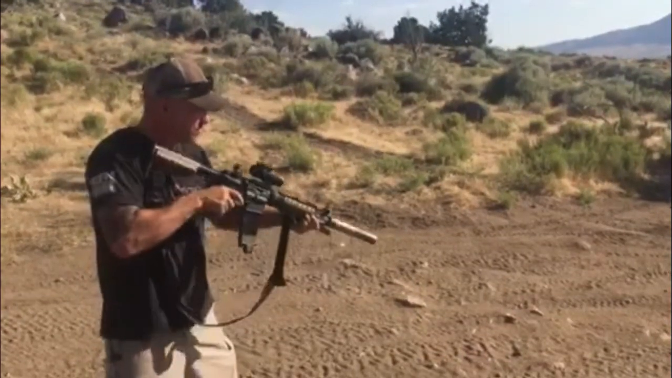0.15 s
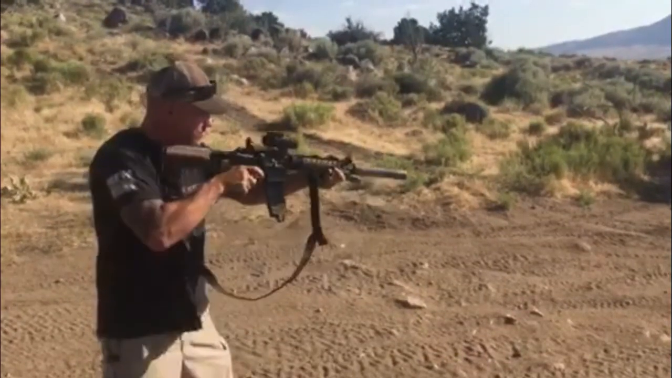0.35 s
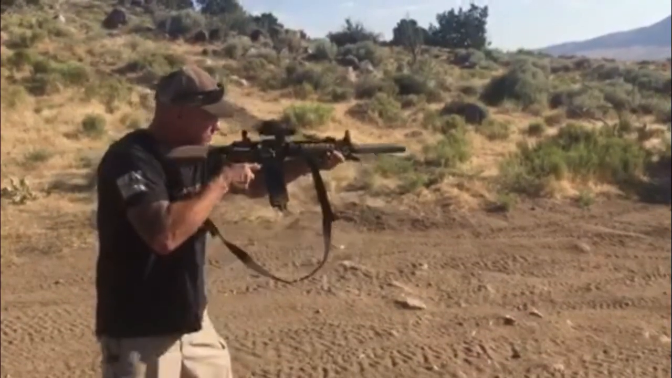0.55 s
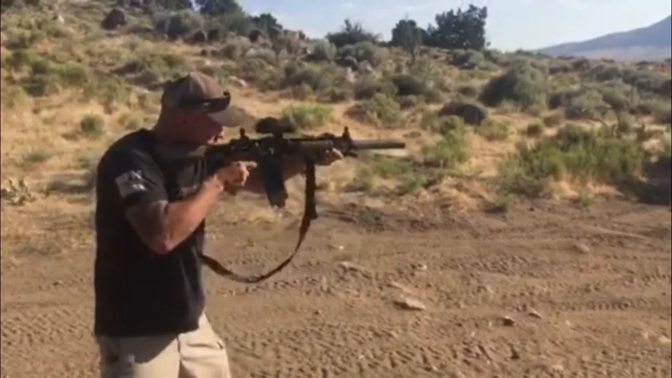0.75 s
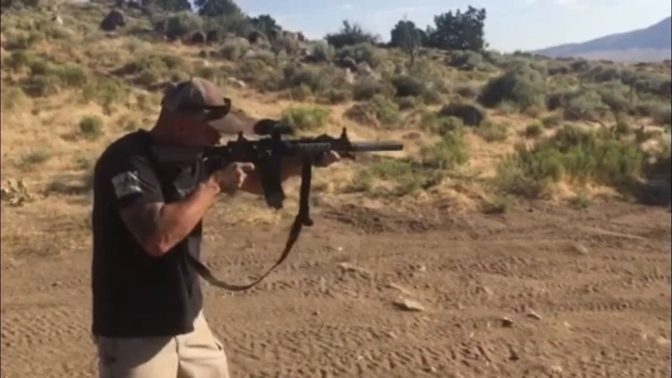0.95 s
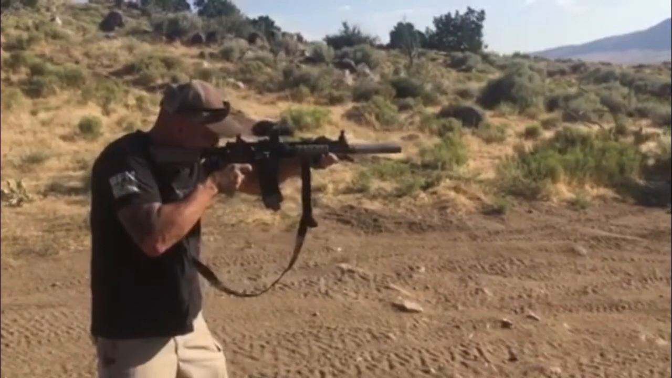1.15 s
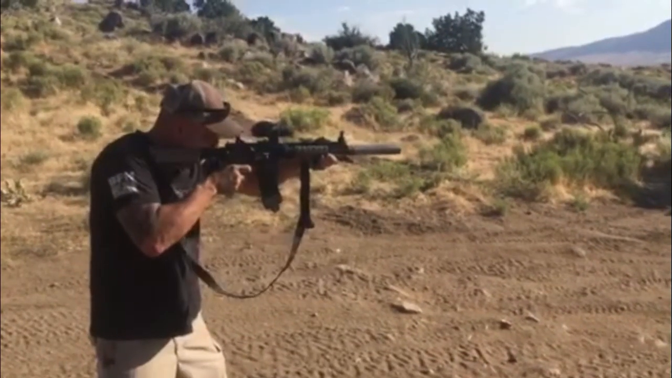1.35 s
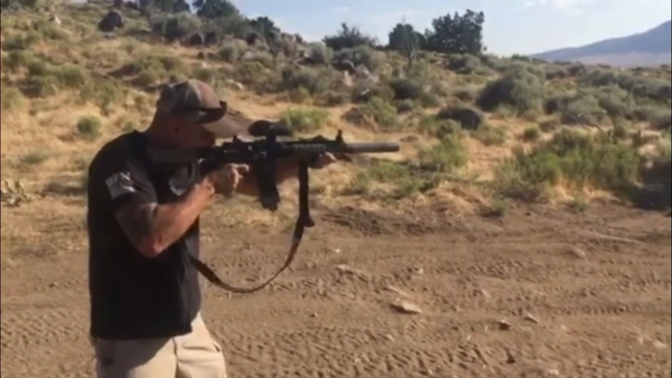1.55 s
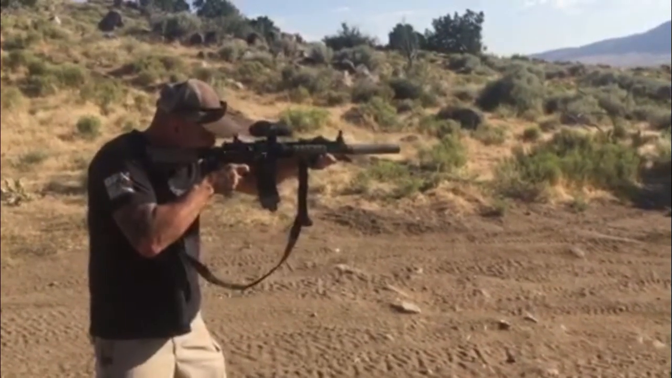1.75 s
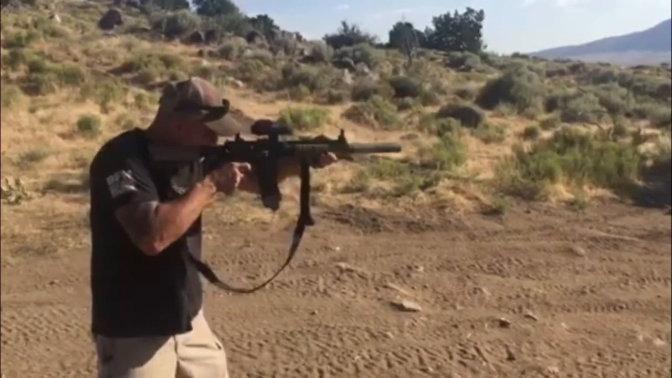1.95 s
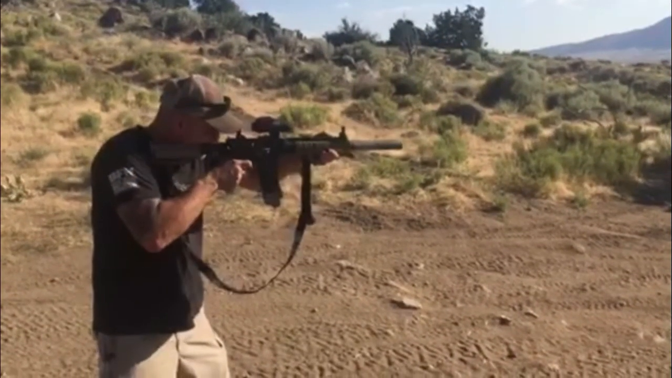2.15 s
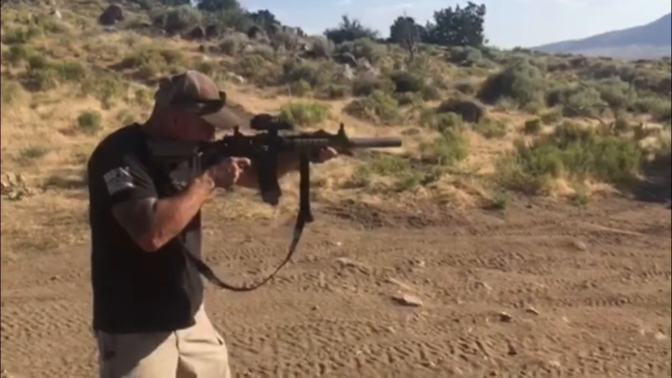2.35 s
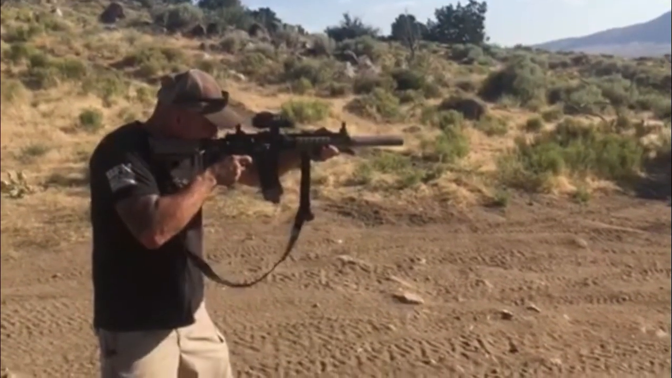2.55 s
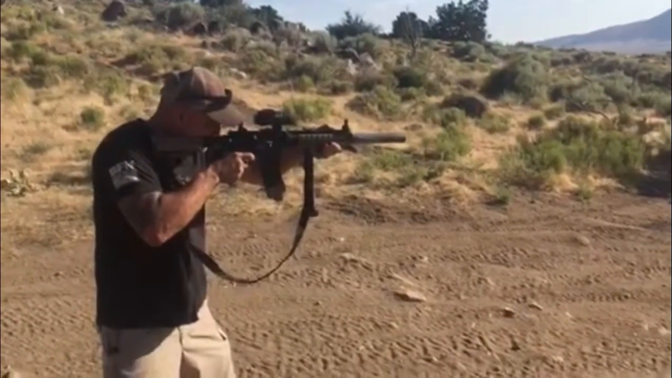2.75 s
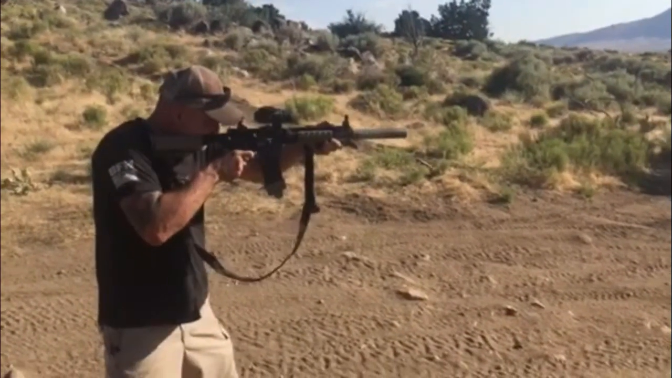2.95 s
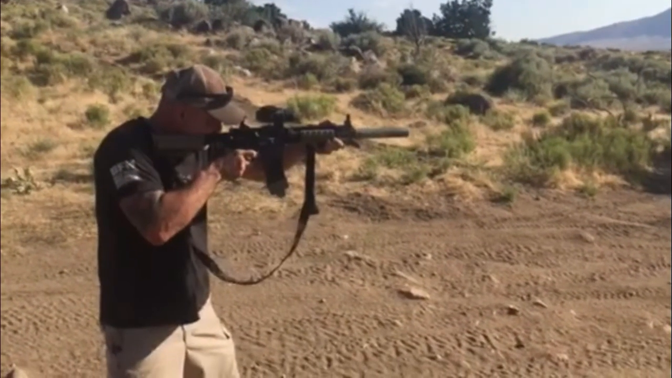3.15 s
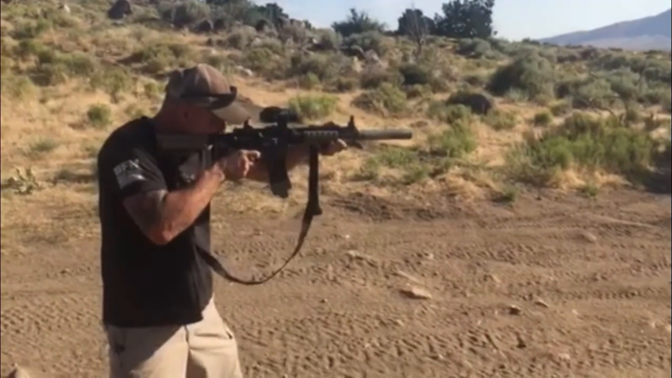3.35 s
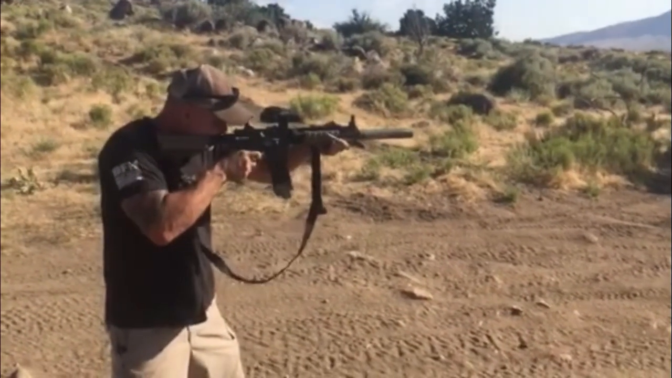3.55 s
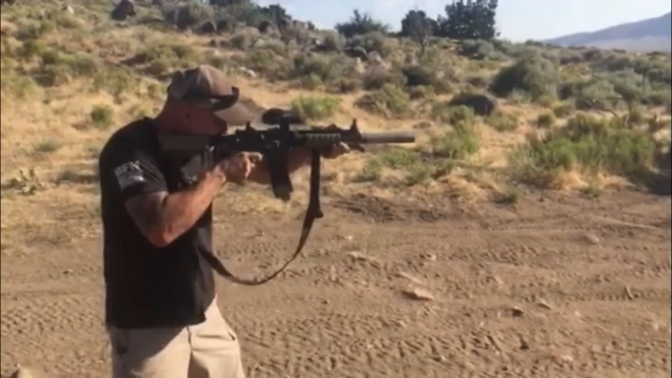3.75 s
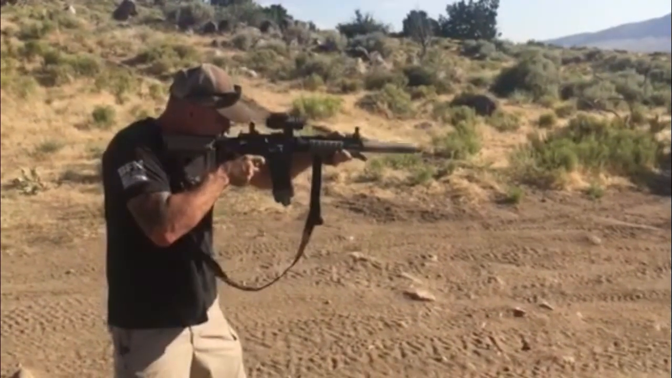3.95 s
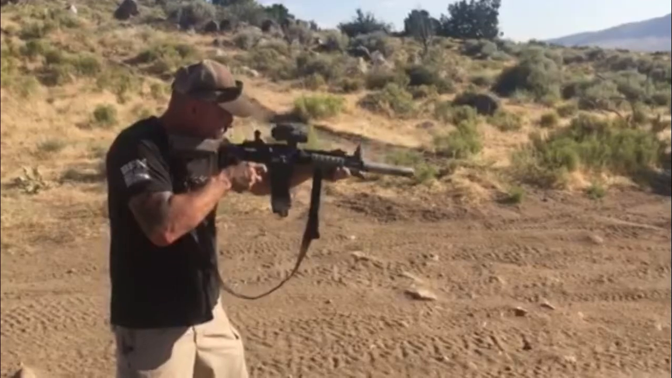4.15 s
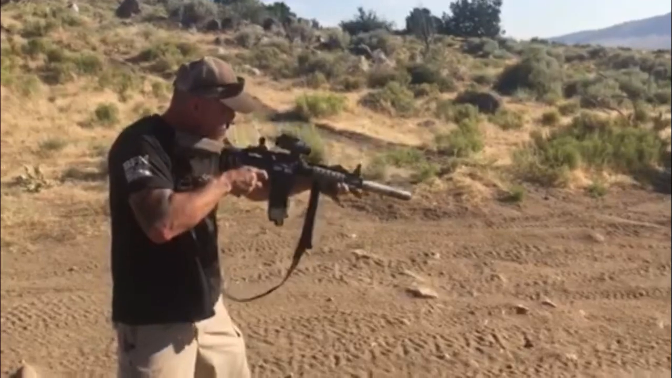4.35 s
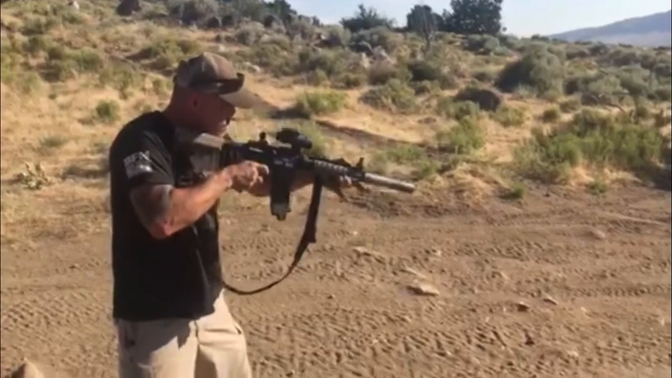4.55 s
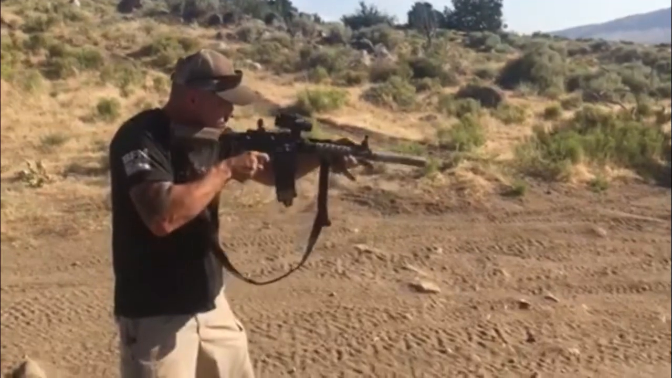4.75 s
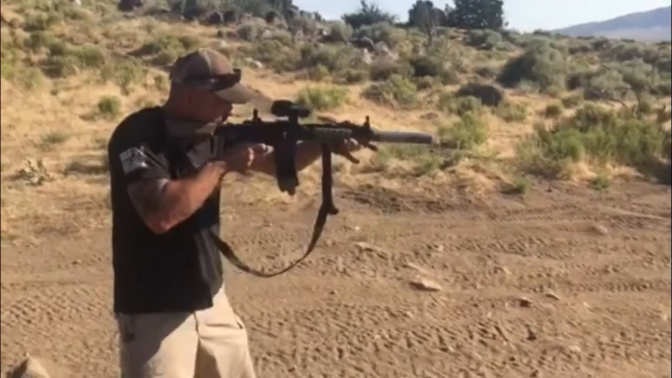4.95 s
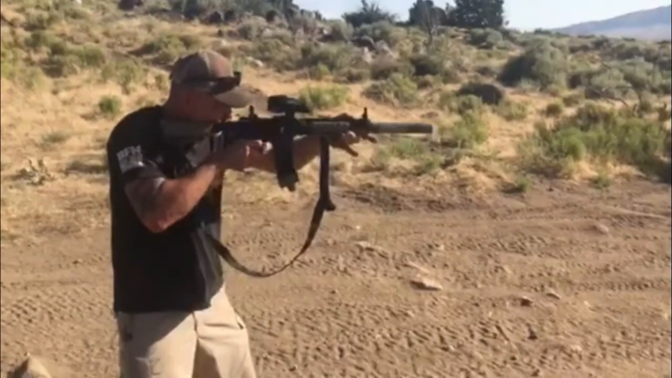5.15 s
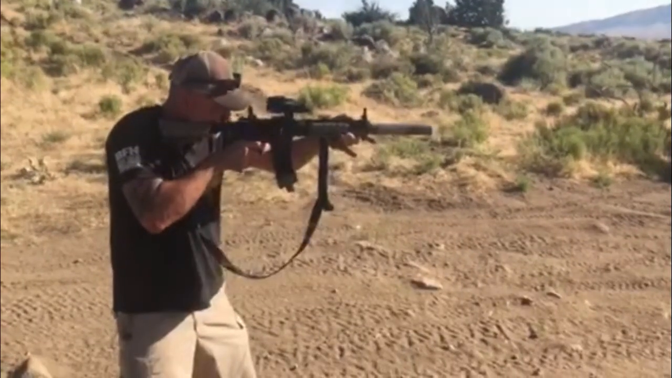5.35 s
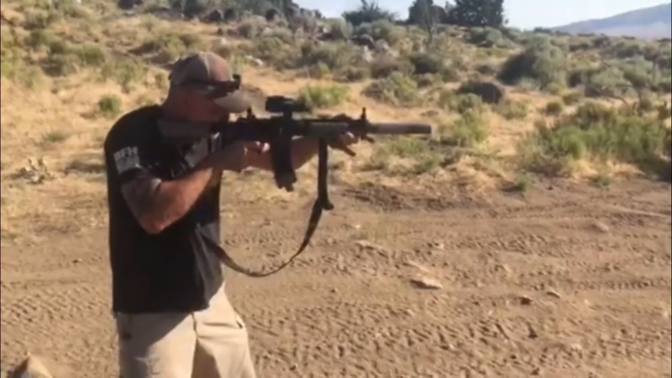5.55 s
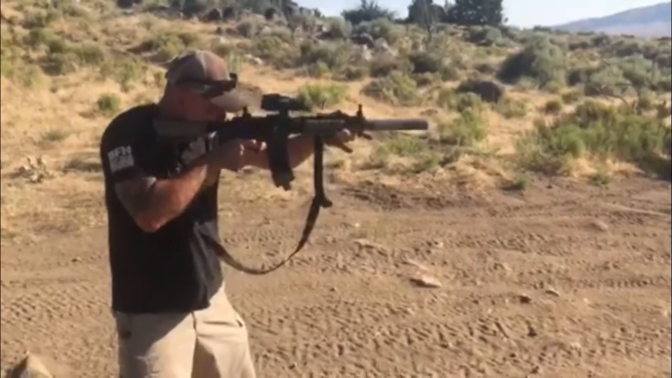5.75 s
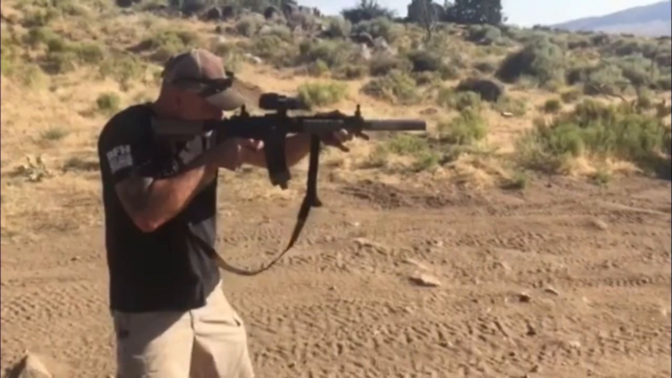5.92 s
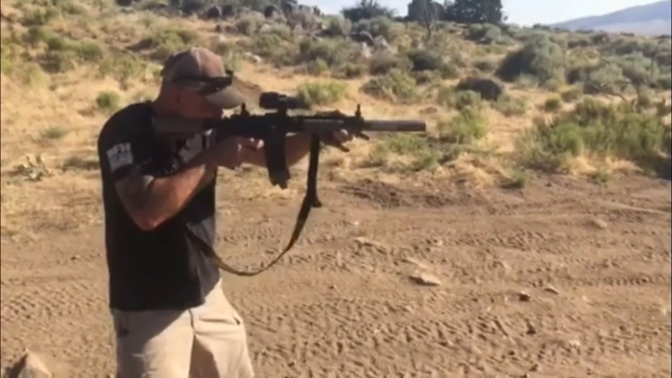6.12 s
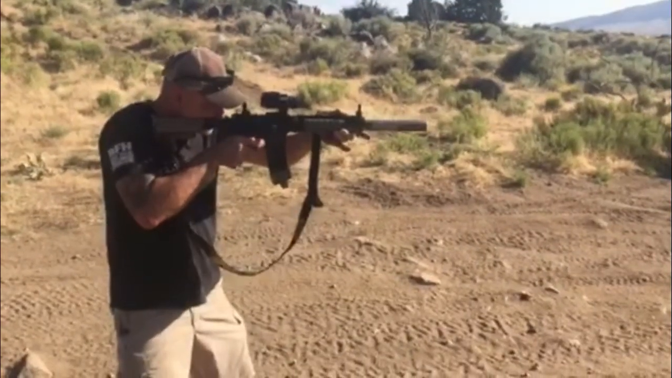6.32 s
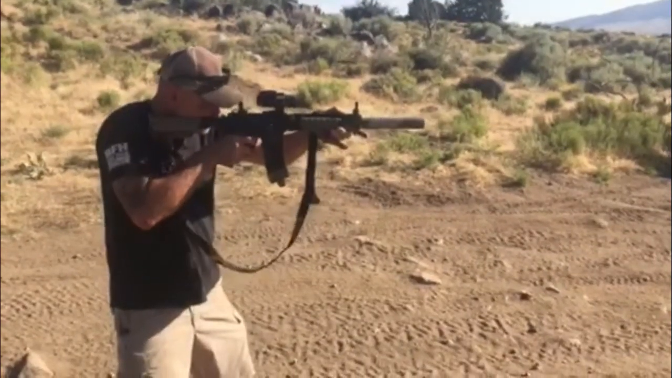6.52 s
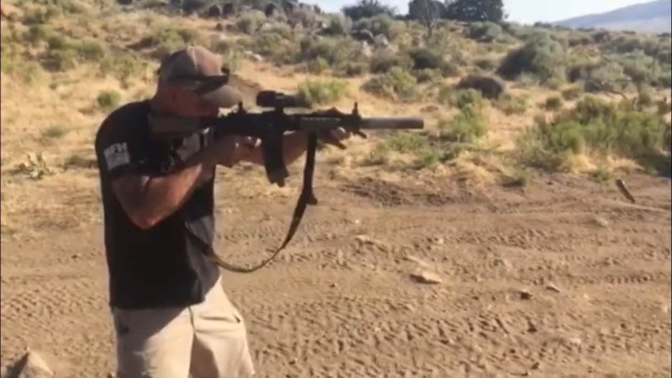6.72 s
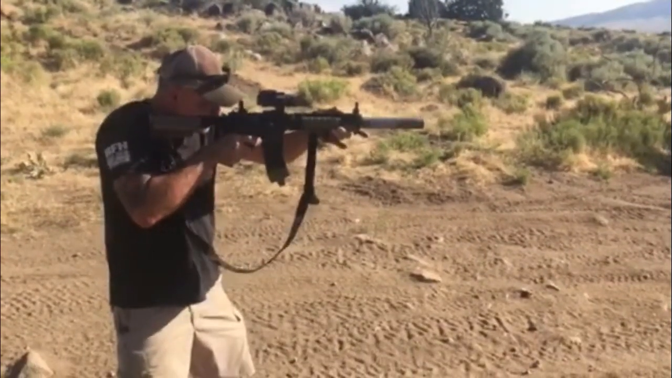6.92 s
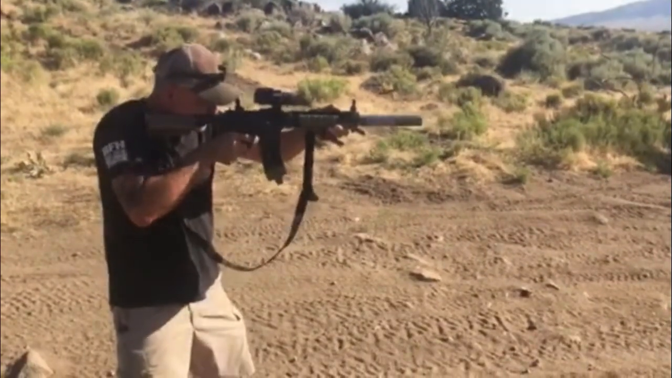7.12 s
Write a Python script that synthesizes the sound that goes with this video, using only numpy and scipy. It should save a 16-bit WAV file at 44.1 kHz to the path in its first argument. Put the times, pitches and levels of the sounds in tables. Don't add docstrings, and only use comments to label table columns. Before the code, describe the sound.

On open desert ground, a close suppressed rifle fires four spaced shots, then three more, with clattering action, rocky echoes and one distant gun thud.

```python
import sys
import numpy as np
from scipy import signal
from scipy.fft import rfft, irfft
from scipy.io import wavfile
from scipy.ndimage import uniform_filter1d

SR = 44100
rng = np.random.default_rng(int(sys.argv[2]) if len(sys.argv) > 2 else 0)


def store_pcm(level_fs):
    pcm = np.round(np.clip(level_fs, -1, 1) * 32767).astype(np.int16)
    wavfile.write(sys.argv[1], SR, np.atleast_2d(pcm).T)


def invert_db(x):
    u = np.asarray(x, float) / 20
    return 10 ** u


N = 316638


def add(out, s, x):
    i = int(s * SR)
    out[i:i + len(x)] += x[:max(N - i, 0)]


def times(seconds):
    return np.arange(int(seconds * SR)) / SR


def fade(t, t60):
    return invert_db(-60 * np.maximum(t, 0) / t60)


def band(x, hz, width_hz, order=3):
    edges = np.clip([hz - width_hz / 2, hz + width_hz / 2], 20, .45 * SR)
    y = signal.sosfilt(signal.butter(order, edges, "bandpass", fs=SR, output="sos"), x)
    return y / np.sqrt(np.mean(y ** 2))


def clumps(n, spread_db, hold=180):
    steps = np.repeat(rng.standard_normal(n // hold + 1), hold)[:n]
    return invert_db(spread_db * uniform_filter1d(steps, hold // 2))


def grit(n, scatter_db, share):
    grain_db = scatter_db * np.minimum(rng.exponential(size=n), 6.5)
    grains = rng.standard_normal(n) * invert_db(grain_db)
    smooth = rng.standard_normal(n)
    return clumps(n, 3.0) * (share * grains / grains.std() + (1 - share) * smooth)


def layers(humps, scatter_db, share):
    out = 0
    for hz, width_hz, db in humps:
        order = 2 if hz > 5000 else 3
        out = out + invert_db(db) * band(grit(len(db), scatter_db, share), hz, width_hz, order)
    return out


def swells(t, rows):
    power = 0
    for s, db, rise_s, t60 in rows:
        rise = np.exp(-(np.minimum(t - s, 0) / rise_s) ** 2)
        power = power + (invert_db(db) * rise * fade(t - s, t60)) ** 2
    return 10 * np.log10(power + 1e-18)


def knock(zones, rise_s=0.0008, length=.08):
    t = times(length)
    y = 0
    for hz, width_hz, db, t60 in zones:
        y = y + invert_db(db) * band(rng.standard_normal(len(t)), hz, width_hz) * fade(t, t60)
    y = y * (1 - np.exp(-(t / rise_s) ** 2))
    return y / np.max(np.abs(y))


def tick(hz, t60, top_db):
    return knock([(hz, 0.49 * hz, 0, t60), (3500, 4500, -6, 1.1 * t60), (8500, 9000, top_db, 0.25 * t60)])


def ring(modes, length=.06, blow_s=0.0004):
    t = times(length)
    y = sum(invert_db(db) * np.sin(2 * np.pi * hz * t) * fade(t, t60) for hz, db, t60 in modes)
    blow = rng.standard_normal(400) * np.exp(-t[:400] / blow_s)
    y = signal.fftconvolve(y, blow)[:len(t)]
    return y / np.max(np.abs(y))


def jet(bands, plateau_s):
    t = times(.25)
    out = 0
    for hz, db, t60 in bands:
        hold_s = plateau_s * (hz / 1400) ** -.25
        out = out + invert_db(db) * band(rng.standard_normal(len(t)), hz, 0.69 * hz) * fade(t - hold_s, t60)
    return out


# pitch in Hz, level in dB per Hz.
AIR_TONE = [(20, -26), (65, 0.44), (200, -12), (636, -19), (1560, -15.5), (3730, -22), (11400, -32),
            (15500, -35)]


def air():
    f = np.maximum(np.fft.rfftfreq(N, 1 / SR), 1)
    hz, db = np.transpose(AIR_TONE)
    y = irfft(rfft(rng.standard_normal(N)) * invert_db(np.interp(np.log(f), np.log(hz), db)), N)
    low = signal.sosfilt(signal.butter(2, 250, fs=SR, output="sos"), y)
    gust = uniform_filter1d(np.repeat(rng.standard_normal(N // 4000 + 1), 4000)[:N], 4000)
    y = y + low * (invert_db(4.8 * gust) - 1)
    return y * invert_db(-67.5) / y.std()


# start in seconds, peak in dB, ring in Hz, treble in dB.
STRAY_TICKS = [(0.0014, -33.5, 5950, -2), (0.0394, -48, 4500, -4), (0.4135, -32, 2500, -6),
               (2.1987, -37, 3662, -30), (3.008, -22, 3280, -10), (4.1894, -60, 4590, -14),
               (4.2808, -29, 6100, -9), (4.2864, -59, 5440, -19), (5.8962, -20, 3240, -11.5),
               (5.911, -20, 6560, -17), (5.9456, -28, 5770, -15), (6.0237, -16.5, 5430, -4),
               (6.3864, -41, 2940, -9.5), (6.598, -19.5, 4340, -3)]


def stray_ticks(out):
    for s, db, hz, top_db in STRAY_TICKS:
        add(out, s, invert_db(db - 7.0) * tick(hz, 0.027, top_db))


# start in seconds, peak in dB.
BRUSHES = [(0.144, -56.5), (0.168, -58), (0.569, -64), (0.609, -62), (0.699, -55.5)]


def cloth(out):
    for s, db in BRUSHES:
        add(out, s, invert_db(db - 3.0) * knock([(1100, 1500, 2, 0.13), (2300, 1900, -4, .1)], rise_s=0.0029))


# start in seconds, peak in dB.
LEVER_HITS = [
    (.3805, -29),
    (.387, -10.5),
    (.391, -25),
]
# pitch in Hz, width in Hz, level in dB, time to fade 60 dB in seconds.
LEVER_RING = [(1230, 910, -8.5, 0.024), (1910, 480, 0.5, 0.02), (2770, 700, -11, 0.039),
              (4230, 1000, -17.5, 0.029), (5730, 840, -4, 0.025), (6420, 2550, 0, 0.019),
              (9120, 1700, -6.5, 0.026), (12760, 3000, -4, 0.017)]
# pitch in Hz, width in Hz, level in dB, time to fade 60 dB in seconds.
LEVER_SCRAPE = [(850, 430, -3.5, 0.22), (2000, 1500, -2, 0.19), (4000, 2500, -8, .12),
                (7000, 4000, -5, 0.15)]


def safety_lever(out):
    for s, db in LEVER_HITS:
        add(out, s, invert_db(db) * knock(LEVER_RING, rise_s=.0004))
    snap_s = LEVER_HITS[1][0]
    add(out, snap_s, invert_db(-45) * knock(LEVER_SCRAPE, rise_s=.012, length=.16))


# start in seconds, overload in dB, time the gas holds in seconds,
# extra low body in dB, echo level in dB.
SHOTS = [
    (1.525, 12, 0.011, -5.4, 1.5),
    (2.2378, 9.5, 0.011, 1.83, -0.5),
    (2.891, 8, 0.0092, -0.14, -1.5),
    (3.5585, 8.5, 0.01, -4, -1),
    (5.7724, 10.5, 0.012, -3, 0),
    (6.4242, 8, 0.01, 1.5, -1.5),
    (7.075, 6, 0.012, -0.5, 0.6),
]
# pitch in Hz, width in Hz, level at the blast in dB, rise up to it in dB.
LEAD_HISS = [(354, 370, -16, 28), (1250, 2200, -24, 18.5), (2840, 300, -19.5, 24), (5900, 7300, -32, 9),
             (12000, 4500, -39.5, 9)]
LEAD_HISS_DB = [1, 1.8, -1.2, 0, 5, -1, -0.9]


def lead_hiss(out):
    lead_s = .0225
    t = np.linspace(-1, 0, int(lead_s * SR))
    for shot, db in zip(SHOTS, LEAD_HISS_DB):
        y = 0
        for hz, width_hz, top_db, rise_db in LEAD_HISS:
            noise = clumps(len(t), 5.7) * rng.standard_normal(len(t))
            y = y + invert_db(top_db + rise_db * t) * band(noise, hz, width_hz)
        add(out, shot[0] - lead_s, invert_db(db) * y)


# pitch in Hz, level in dB, time to fade 60 dB in seconds.
RIFLE_JET = [(136, -9.5, 0.023), (300, -7, 0.032), (715, -4.5, 0.041), (1440, -3.5, 0.073),
             (2290, -2, 0.08), (4860, -3.5, .1), (6880, -6, 0.079), (11500, -4, 0.063)]


def blasts(out):
    for s, over_db, plateau_s, body_db, _ in SHOTS:
        bands = [(hz, db + body_db * (hz < 500), t60) for hz, db, t60 in RIFLE_JET]
        add(out, s, invert_db(over_db - 11) * jet(bands, plateau_s))


# level in dB, pitch in Hz.
SWINGS = [(-19, 55), (-0.5, 66), (-17, 70), (-6.5, 64), (-1, 62), (-6.5, 75), (-8, 170)]
SWING_LAGS_S = [.026, .0195, .0225, .0195, .0205, .0155, .0195]


def recovery():
    out, t = np.zeros(N), times(.25)
    flutter_s = .012
    lead = t[t < flutter_s] - flutter_s
    shudder = invert_db(-7) * np.sin(2 * np.pi * 225 * lead) * np.sqrt(1 + lead / flutter_s)
    for shot, lag_s, (db, hz) in zip(SHOTS, SWING_LAGS_S, SWINGS):
        swing = np.sin(2 * np.pi * hz * t) * fade(t, 0.071)
        add(out, shot[0] + lag_s - flutter_s, -invert_db(db) * np.r_[shudder, swing])
    return signal.sosfilt(signal.butter(1, 22, "highpass", fs=SR, output="sos"), out)


# start in seconds, peak in dB, lower ring in dB, rattle in dB.
CLACKS = [(1.57, -1, -7, -22.5), (2.2813, -4.5, -6.5, -23.5), (2.9357, -5, -10.5, -26),
          (3.6022, -7, -5, -24.5), (5.8169, -0.8, -5, -24), (6.4683, -4, -17, -25), (7.1175, -3, -7, -26)]
# pitch in Hz, width in Hz, level in dB, time to fade 60 dB in seconds.
BOLT_RING = [(6610, 1200, 0.5, 0.018), (12500, 2000, -4.5, 0.0091), (8900, 9400, -8.5, 0.019),
             (4270, 9800, -10, 0.011)]
# pitch in Hz, width in Hz, level in dB,
# time to fade 60 dB in seconds.
FRAME_RING = [(1760, 330, -1.5, 0.044), (3020, 1700, 3.5, 0.017)]


def bolt_clacks(out):
    bolt_zones = [(hz, w, db, t60 * 0.71) for hz, w, db, t60 in BOLT_RING]
    for s, db, low_db, _ in CLACKS:
        bolt = knock(bolt_zones, rise_s=.0012)
        add(out, s, invert_db(db) * (bolt + invert_db(low_db) * knock(FRAME_RING)))


# delay after the clack in seconds, level in dB, rise in seconds,
# time to fade 60 dB in seconds.
RATTLE = [
    (.008, 2.2, .004, 0.069),
    (.034, -2.7, .008, 0.059),
    (.055, -12, 0.013, 0.15),
    (0.098, -20, 0.041, 0.12),
]


def bolt_rattle(out):
    t = times(.25)
    for s, _, _, rattle_db in CLACKS:
        db = rattle_db + swells(t, RATTLE)
        top = db - 5 - 71.5 * t
        humps = [(1700, 1500, db - 5.0), (3960, 2600, db - 2.5), (6800, 1200, top),
                 (11950, 6300, top - 9.5), (408.8, 1000, db - 13.5)]
        add(out, s, layers(humps, 3.5, 0.11))


# ring in Hz, time to fade 60 dB in seconds, treble in dB.
HOME = (3800, 0.028, -23)
LATCH = (1360, 0.021, -16)
SETTLE = (1830, 0.037, -20)
TRIGGER = (2550, 0.022, 2.5)
# start in seconds, peak in dB.
HOMES = [(1.601, -10.5), (2.3156, -11.5), (2.9652, -12.5), (3.6323, -10.5), (5.8417, -11.5), (6.5072, -14),
         (7.1462, -30), (7.159, -13.5)]
LATCHES = [(1.62, -17), (2.3292, -19), (2.9837, -22), (3.652, -27), (5.8561, -15), (6.518, -19.5)]
SETTLES = [(1.6326, -27), (2.3436, -27), (3.023, -24), (5.8684, -19.5), (5.9154, -24), (6.0074, -31)]
TRIGGER_TICKS = [(1.6754, -19), (1.6793, -25), (2.2054, -42), (2.3682, -24.5), (3.5194, -38), (3.6759, -24),
                 (6.5557, -22.5)]
# pitch in Hz, width in Hz, level in dB, time to fade 60 dB in seconds.
LATCH_THUD = [(590, 130, -.1, 0.025)]


def bolt_parts(out):
    for part, blows in ((HOME, HOMES), (LATCH, LATCHES), (SETTLE, SETTLES), (TRIGGER, TRIGGER_TICKS)):
        for s, db in blows:
            add(out, s, invert_db(db - 4.0) * tick(*part))
    for s, *_ in SHOTS:
        add(out, s + .091, invert_db(-33.5) * knock(LATCH_THUD, rise_s=0.002))


# delay in seconds, level in dB, rise in seconds,
# time to fade 60 dB in seconds.
SLOPES = [
    [(.218, -36.5, 0.0034, 0.15), (.255, -39, 0.0039, 0.2), (.385, -50, 0.021, 0.094),
     (.57, -53.5, 0.022, .15), (.62, -52.5, .05, .4), (.69, -46, .05, .3), (.8, -57.5, .04, 0.26)],
    [(.23, -36.5, 0.0049, 0.16), (.27, -41.5, .012, 0.089), (.33, -52, 0.027, .15), (.42, -55, 0.019, .1),
     (.6, -52.5, .03, .2)],
    [(.04, -39, 0.014, 0.5), (.17, -42, 0.0036, 0.13), (.29, -48.5, 0.05, 0.26), (.36, -45.5, 0.02, 0.19)],
]
# delay in seconds, level in dB, rise in seconds,
# time to fade 60 dB in seconds.
BRUSH = [
    (0.17, -53, .05, 1.9),
    (.2, -52, 0.065, 2),
    (0.036, -50.5, 0.017, 3.15),
]
# pitch in Hz, level in dB.
UPPER_HUMP = [(2750, -7), (3400, -1.5), (4100, -4.5), (4900, -10), (5900, -8.5), (7200, -13.5), (9000, -18)]
SLOPE_UPPER_DB = [-7, -3, -15.5]
BRUSH_UPPER_DB = [1.5, 1.5, -18.5]
BRUSH_LOWS_DB = [-9.5, -8, -12.5]
LOW_ECHO_DB = [-23, -20.5, -8.5]
TREBLE_DB = [-1.9, -1.4, -16]
# start in seconds, peak in dB, ring in Hz.
ROCKS_FIRST = [(3.775, -33, 1680), (3.78, -32, 1600), (3.784, -35, 2450), (3.814, -23, 1760),
               (3.828, -33, 1600), (3.865, -37.5, 1650), (3.883, -38.5, 2060), (3.931, -31, 1860),
               (3.942, -33.5, 1940), (3.991, -35, 2300), (4.048, -41, 2190), (4.125, -49, 1700),
               (4.14, -37.5, 1580), (4.198, -45.5, 1695), (4.214, -39, 1529), (4.226, -34, 1610),
               (4.242, -35.5, 1357), (4.257, -38.5, 1660), (4.313, -35.5, 1700)]
ROCKS_SECOND = [(6.011, -39, 1820), (6.025, -21, 1910), (6.038, -33, 1920), (6.091, -35.5, 1426),
                (6.122, -37, 2130), (6.186, -35, 1900), (6.193, -47, 1760), (6.37, -37, 1615)]
ROCKS_FAR = [(6.707, -29, 2300), (6.734, -22.5, 1140), (6.749, -29, 1140), (6.768, -27.5, 1150),
             (6.789, -31, 1090), (6.828, -29.5, 1030), (6.862, -38, 1050), (6.944, -39, 1010),
             (6.964, -38, 1140), (6.994, -37, 1110), (7.018, -35, 710), (7.027, -32, 1100)]
TAIL_SOURCE_S = [3.559, 5.772, 6.66]


def shift(rows, by_db):
    return [(s, db + by_db, rise_s, t60) for s, db, rise_s, t60 in rows]


def tail(k):
    t = times(1.2)
    slopes, brush = SLOPES[k], [BRUSH[k]]
    lower = swells(t, slopes + brush)
    upper = swells(t, shift(slopes, SLOPE_UPPER_DB[k]) + shift(brush, BRUSH_UPPER_DB[k]))
    loss = 24.5 * np.maximum(t - BRUSH[k][0], 0)
    humps = [(1585, 1100, lower), (167.0, 130, swells(t, brush) + BRUSH_LOWS_DB[k]),
             (750, 450, lower + LOW_ECHO_DB[k])]
    for hz, db in UPPER_HUMP:
        level = upper + db + TREBLE_DB[k] * (hz > 4500) - loss * ((hz / 5000) ** 2 - .45)
        humps.append((hz, 0.2 * hz, level))
    out = layers(humps, 1.6, 0.94) * np.clip((t[-1] - t) / 0.23, 0, 1)
    for s, db, hz in (ROCKS_FIRST, ROCKS_SECOND, ROCKS_FAR)[k]:
        rock = knock([(hz, .42 * hz, 0, .012), (3699.5, 2200.0, -6.5, .003)], rise_s=0.0024)
        add(out, s - TAIL_SOURCE_S[k], invert_db(db - 3.0) * rock)
    return out


TAIL_OF_SHOT = [0, 0, 0, 0, 1, 1]


def echoes(out):
    for shot, k in zip(SHOTS, TAIL_OF_SHOT):
        add(out, shot[0], invert_db(shot[-1]) * tail(k))


# start in seconds, peak in dB.
CASE_HITS = [(4.1949, -42), (3.63, -50)]
# pitch in Hz, level in dB, time to fade 60 dB in seconds.
CASE_RING = [(15180, 5, 0.16), (15100, -2, 0.14), (15200, -3, 0.5)]


def spent_cases(out):
    for s, db in CASE_HITS:
        add(out, s, invert_db(db) * ring(CASE_RING, length=.4))


# start in seconds, peak in dB.
FAR_GUN = [
    (6.66, -5),
]
# pitch in Hz, level in dB, time to fade 60 dB in seconds.
FAR_JET = [(159, 4.5, 0.085), (246, -11.5, 0.17), (565, -4.5, 0.04), (1080, 1.5, 0.058), (1700, 5.5, 0.063),
           (3480, -3.5, 0.063), (7000, -20.5, 0.036)]


def far_gun(out):
    s, db = FAR_GUN[0]
    t = times(0.045)
    add(out, s - .007, invert_db(db - 20.5) * knock([(1500, 590, 0, 0.0091)]))
    crack = np.sin(2 * np.pi * 1250 * t) * fade(t, 0.0063) * np.minimum(t / 0.00057, 1)
    add(out, s + 0.00098, -invert_db(db + 5.0) * crack)
    add(out, s + .0037, -invert_db(db - .1) * crack)
    add(out, s + 0.00472, invert_db(db - 7.5) * np.sin(2 * np.pi * 190 * t) * fade(t, 0.039))
    add(out, s, invert_db(db - 20.0) * jet(FAR_JET, 0.0015))
    t = times(.5)
    roll = band(rng.standard_normal(len(t)), 165, 120) * fade(t, 1.2) * np.minimum(t / 0.026, 1)
    add(out, s + 0.026, invert_db(db - 39.5) * roll)
    add(out, s, tail(2))


def scene():
    out = air()
    for source in (stray_ticks, cloth, safety_lever, lead_hiss, blasts, bolt_clacks, bolt_rattle,
                   bolt_parts, echoes, spent_cases, far_gun):
        source(out)
    return out[None]


def band_limit(x):
    return signal.sosfilt(signal.butter(12, 16800, fs=SR, output="sos"), x)


def record(dry):
    x = signal.sosfilt(signal.butter(2, 42, "highpass", fs=SR, output="sos"), dry)
    x = np.clip(x, -1.1, 1.1) + recovery()
    x = signal.sosfilt(signal.ellip(8, .2, 60, 15800, fs=SR, output="sos"), x)
    return band_limit(np.clip(x, -1, 1))


dry = scene()
out = record(dry)
store_pcm(out)
```